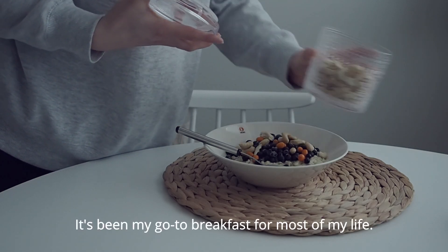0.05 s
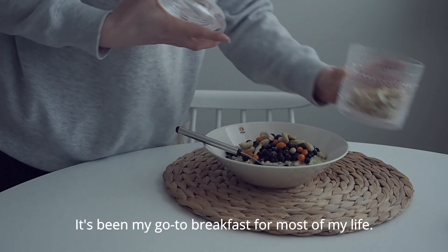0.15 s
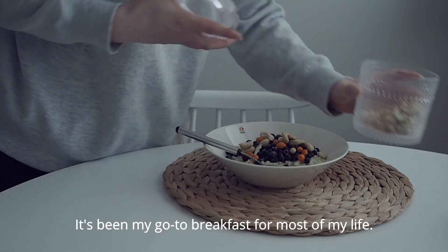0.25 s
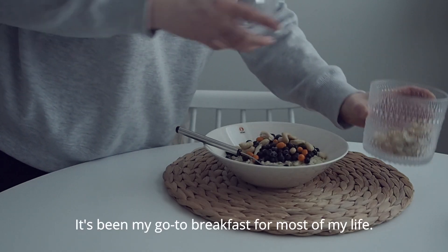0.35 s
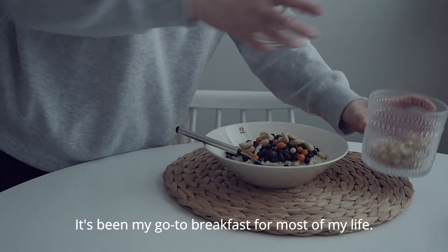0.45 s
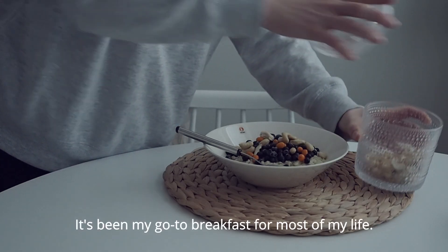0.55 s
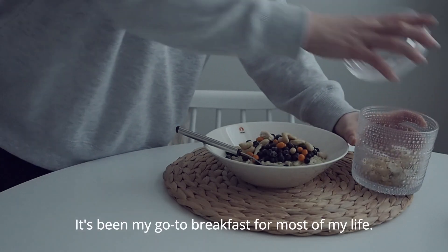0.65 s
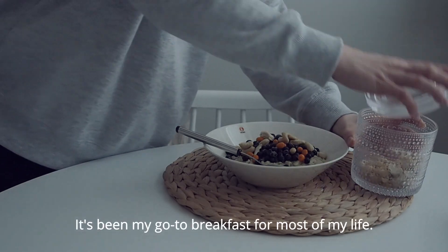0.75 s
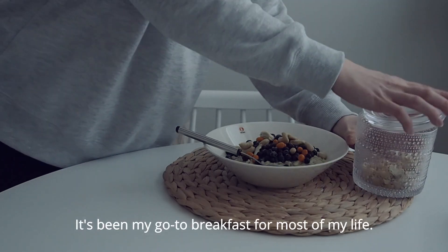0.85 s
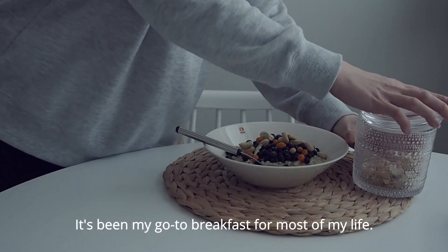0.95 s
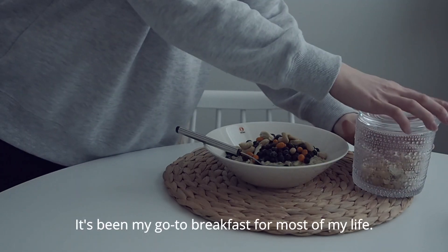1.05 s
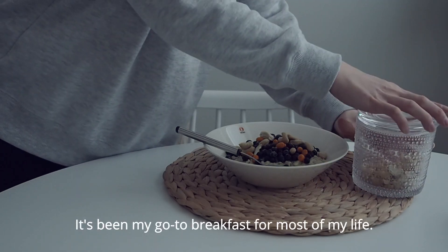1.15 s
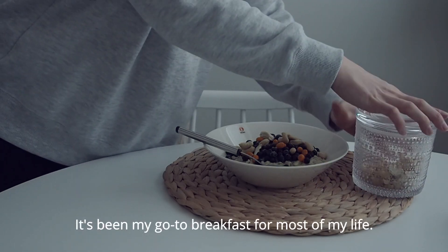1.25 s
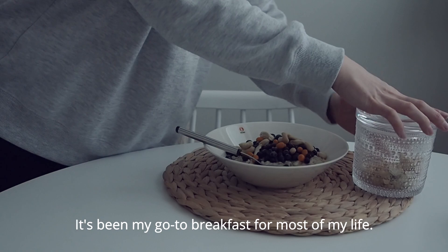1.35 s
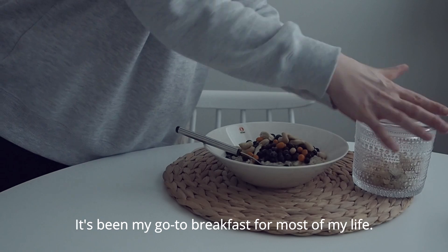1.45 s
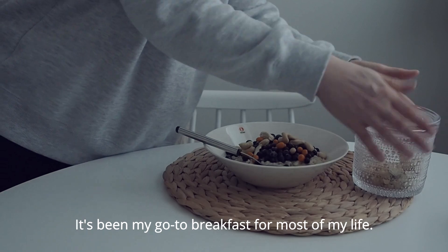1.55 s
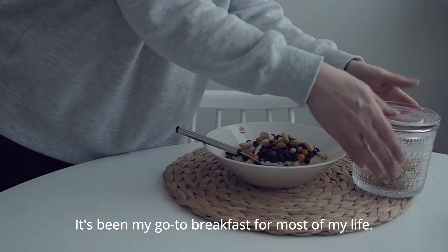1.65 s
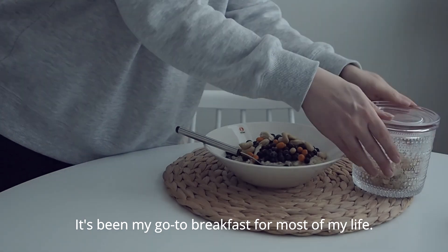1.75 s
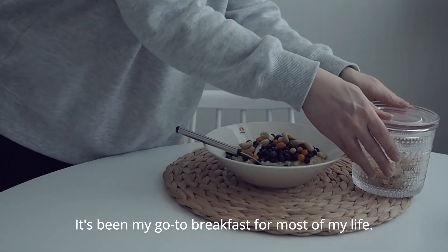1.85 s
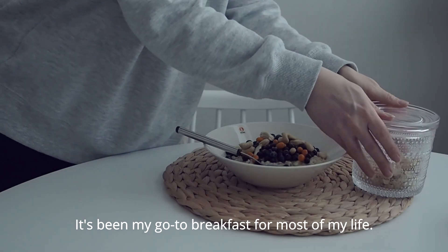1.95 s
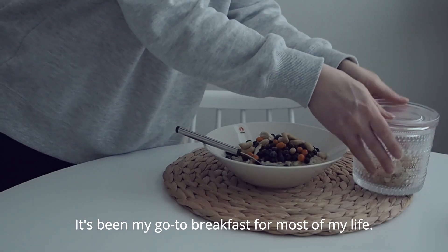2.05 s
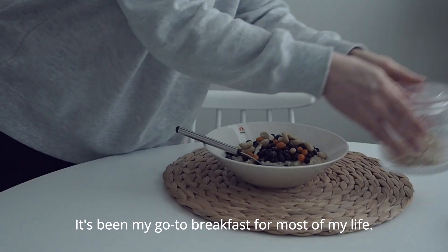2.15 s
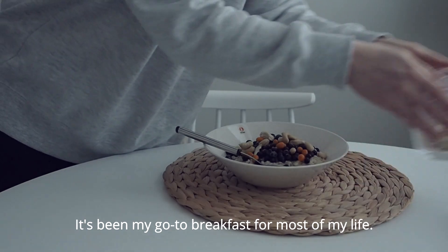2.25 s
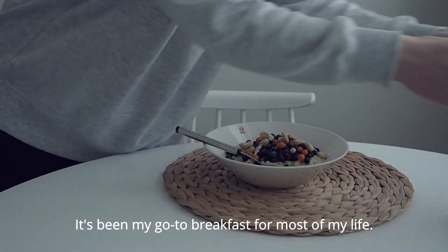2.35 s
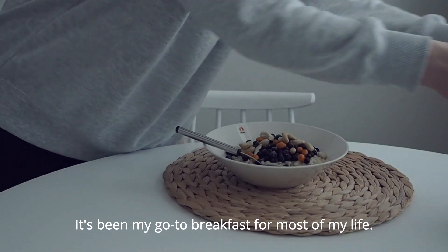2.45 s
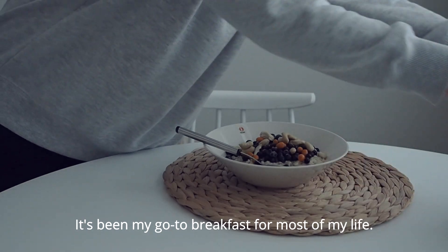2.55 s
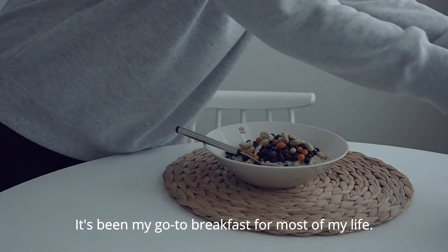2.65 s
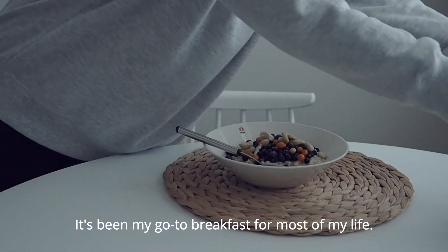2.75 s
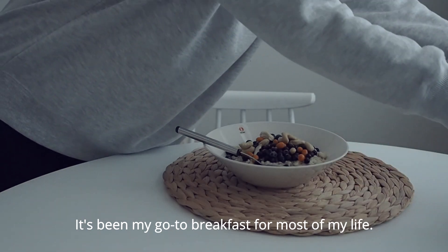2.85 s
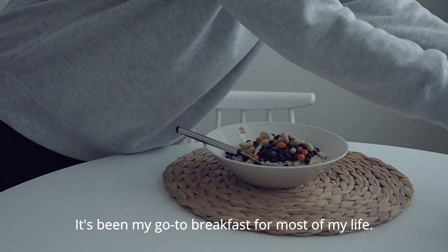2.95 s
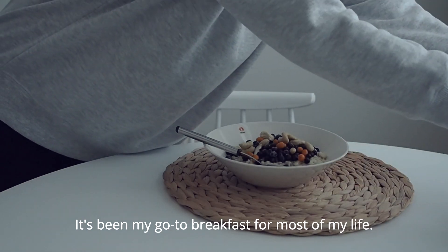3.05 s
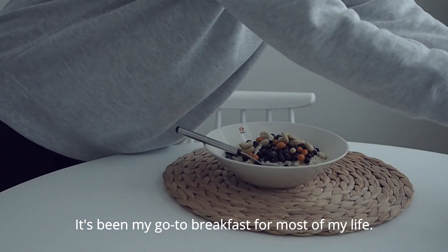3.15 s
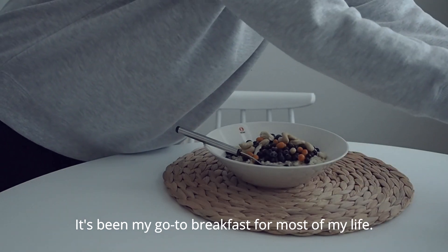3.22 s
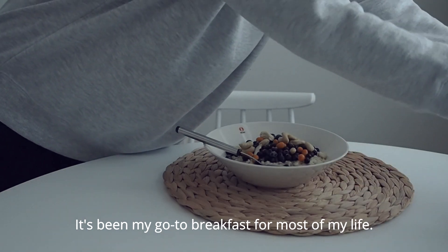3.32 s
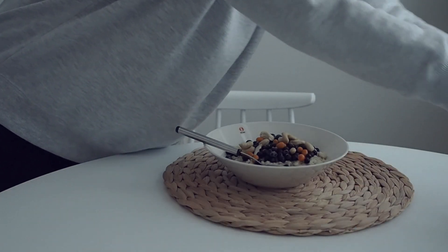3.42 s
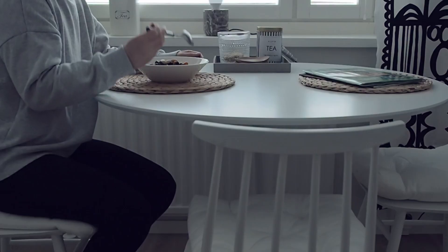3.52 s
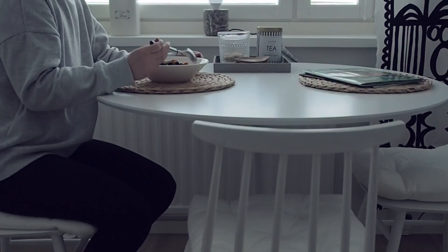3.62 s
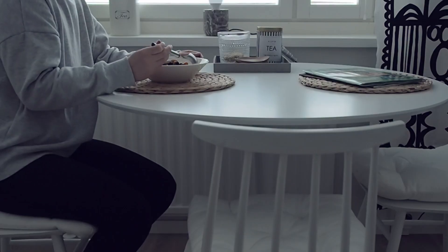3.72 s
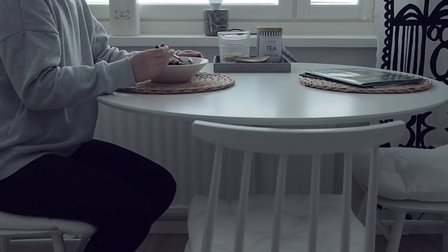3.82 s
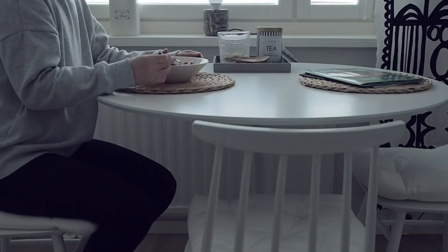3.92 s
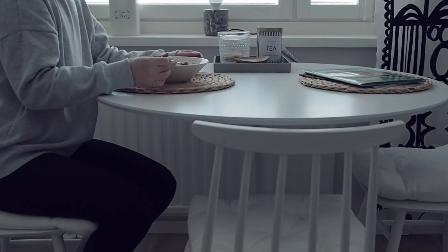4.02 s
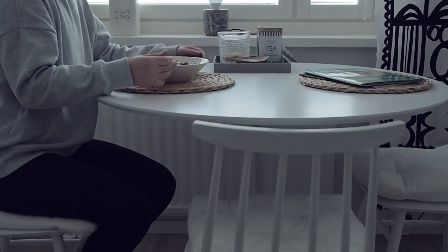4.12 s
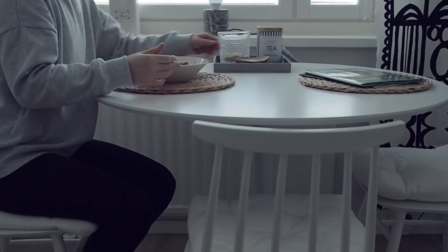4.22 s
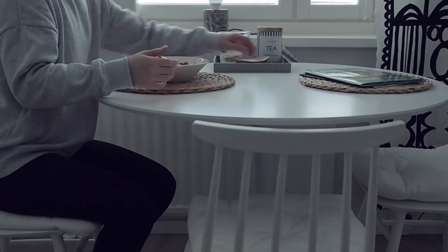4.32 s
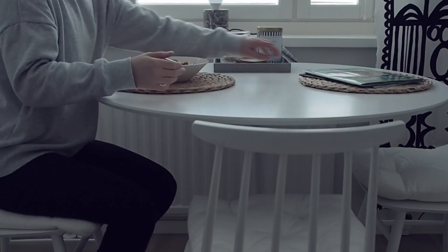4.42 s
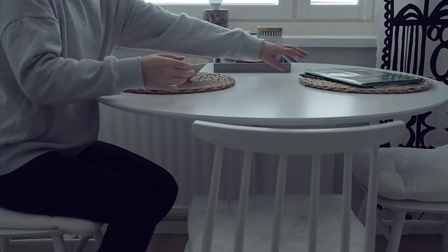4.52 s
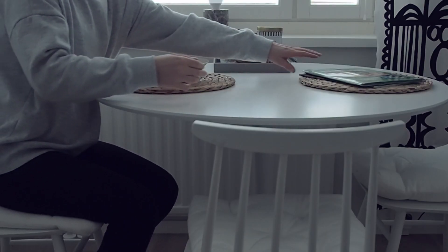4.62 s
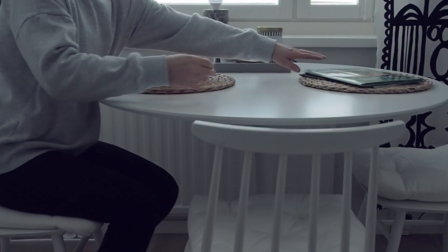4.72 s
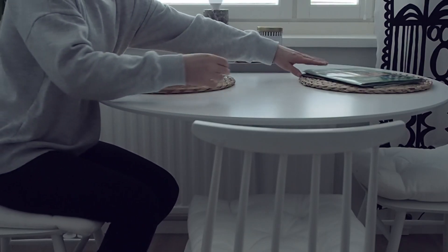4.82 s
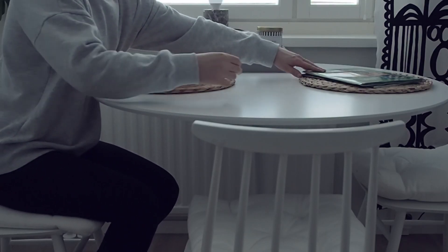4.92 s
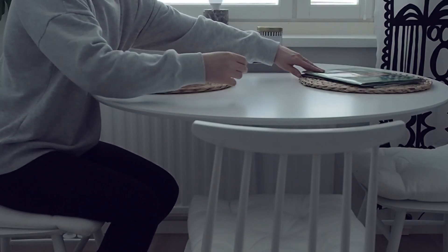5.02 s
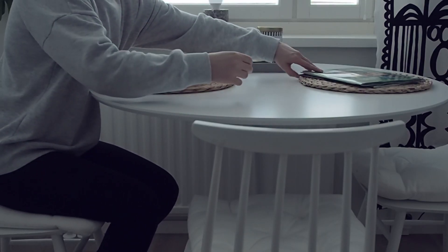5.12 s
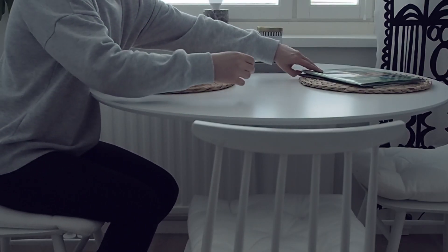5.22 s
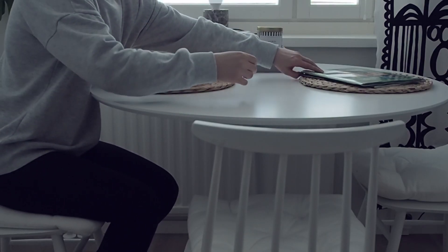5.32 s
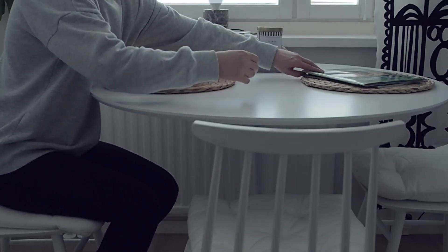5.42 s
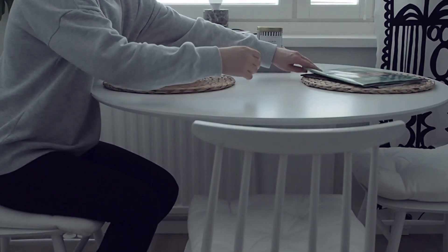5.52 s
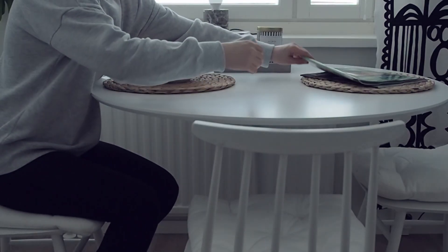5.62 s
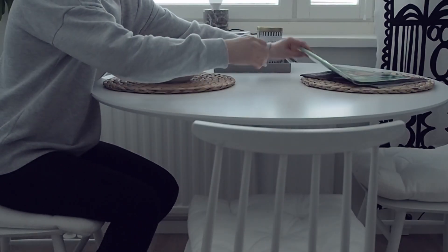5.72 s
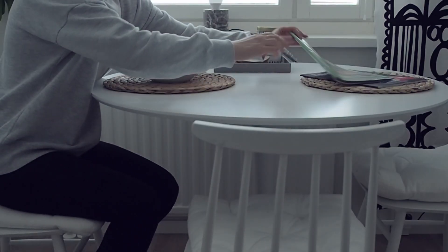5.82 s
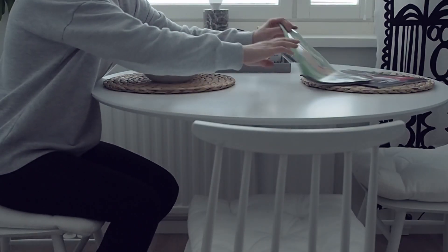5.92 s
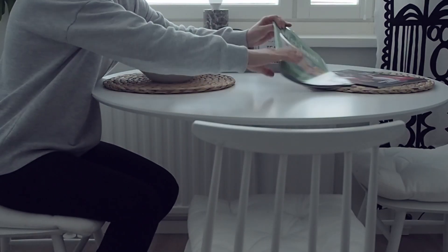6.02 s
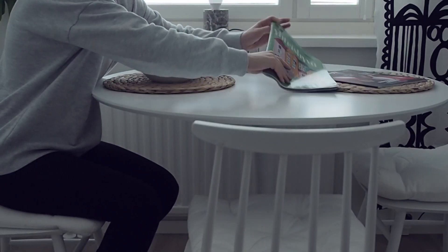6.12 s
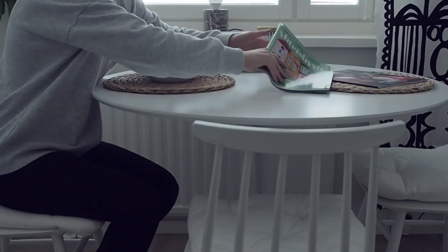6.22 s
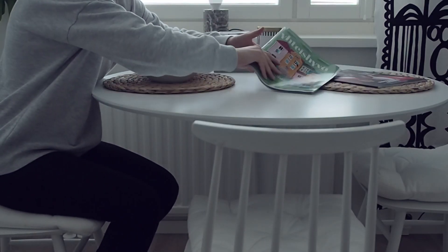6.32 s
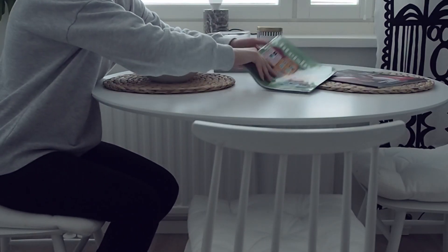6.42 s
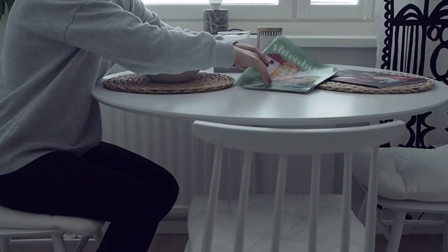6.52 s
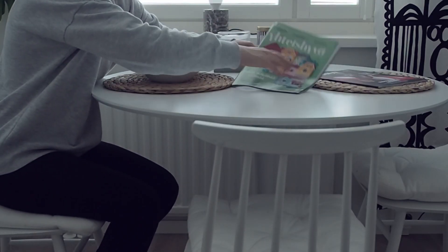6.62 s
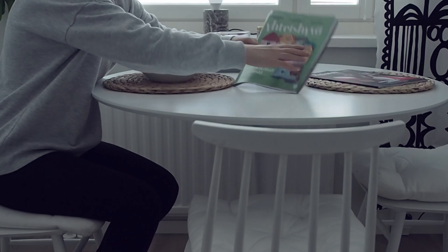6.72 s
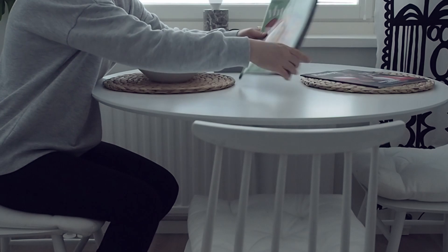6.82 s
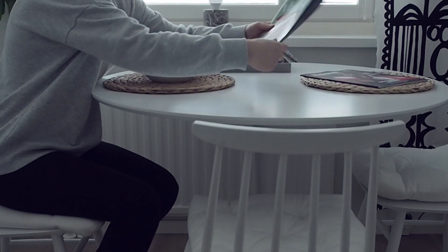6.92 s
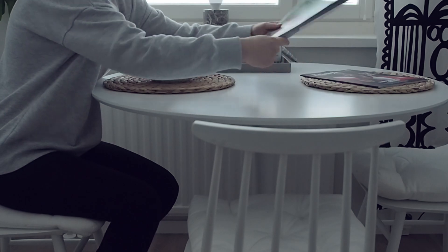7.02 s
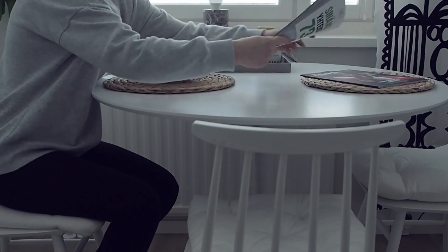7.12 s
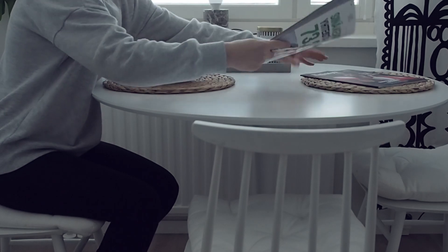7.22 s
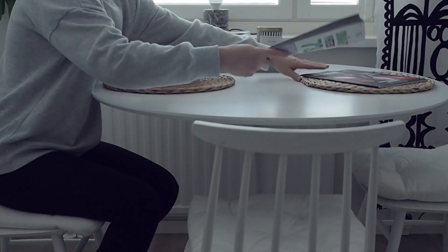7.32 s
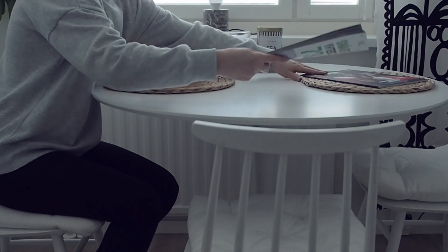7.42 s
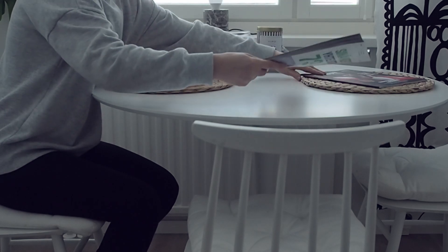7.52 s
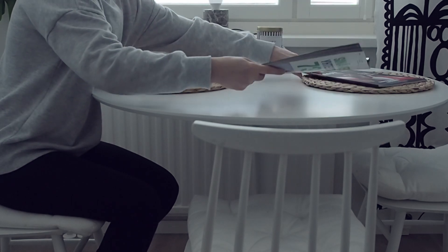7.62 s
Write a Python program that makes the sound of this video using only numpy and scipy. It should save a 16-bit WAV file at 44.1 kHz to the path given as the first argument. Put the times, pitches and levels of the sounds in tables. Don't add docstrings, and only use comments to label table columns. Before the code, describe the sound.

Heard from a distance through short, bright kitchen echoes: light finger taps on a glass lid with fabric rustle, then the lid chattering and seating on a glass jar with clear ringing. A small later clink follows, then a woody double knock as the jar is set down. A spoon clatters quickly on a ceramic bowl and strikes once more. Soft sleeve brushes lead into crisp paper sliding and flapping, over faint hum and hiss.

```python
import sys
import numpy as np
from scipy import signal
from scipy.fft import rfft, irfft, next_fast_len
from scipy.io import wavfile
from scipy.ndimage import uniform_filter1d, minimum_filter1d

SR = 44100
rng = np.random.default_rng(int(sys.argv[2]) if len(sys.argv) > 2 else 0)


def magnitude_from_level(level_db):
    exponent = np.asarray(level_db, float) / 20
    return 10 ** exponent


def bounce(signal):
    frames = np.transpose(np.atleast_2d(signal))
    limited = np.clip(frames, -1, 1)
    pcm = np.round(limited * 32767).astype(np.int16)
    wavfile.write(sys.argv[1], SR, pcm)


N = 337806

# (frequency [Hz], level [dB], left over right [dB])
MIC = [(60, -34, 0.5), (127, -11, 1.9), (620, 1.9, 2.5), (1300, 3.5, 0.9), (2500, -1, 1.5), (3500, 4, 1.5),
       (5000, 2, 2), (6100, -2.5, 0.5), (8450, -0.6, 3.5), (10200, -2.5, 2.5), (15100, 2.5, 8.5)]


def evened(x):
    return x / np.sqrt(np.mean(x ** 2) + 1e-20)


def read(points, hz, axis=1):
    points = np.array(points)
    return np.interp(np.log(hz + 1), np.log(points[:, 0] + 1), points[:, axis])


def add(mix, s, sound):
    part = mix[round(s * SR):][:len(sound)]
    part += sound[:len(part)]


def coloured(x, points):
    size = next_fast_len(x.shape[-1])
    response = magnitude_from_level(read(points, np.fft.rfftfreq(size, 1 / SR)))
    return irfft(rfft(x, size) * response, size)[..., :x.shape[-1]]


def drift(rate_hz):
    return evened(signal.lfilter(*signal.butter(2, rate_hz, fs=SR), rng.standard_normal((2, N))))


def ringing(pitches, modes, blows, lift_db, damping, sharp=(1, 1)):
    out, t = np.zeros(N), np.arange(SR // 4) / SR
    hz = np.c_[pitches]
    t60, *kinds_db = np.transpose(modes)[:, :, None]
    phases = rng.random((len(blows), len(modes), 1))
    for (s, blow_db, kind), phase in zip(blows, phases):
        kind = round(kind)
        level = magnitude_from_level(kinds_db[kind] + blow_db + lift_db - 60 * t / t60 / damping[kind])
        waves = level * np.sin(2 * np.pi * (hz * sharp[kind] * t + phase))
        add(out, s, waves.sum(0) * np.minimum(t * 600, 1))
    return out


def lasting(modes, blows, build_ms, lag_turns):
    grip_s = 0.045
    out, t = np.zeros((2, N)), np.arange(SR // 2) / SR
    hz, t60, *kinds_db = np.transpose(modes)[:, :, None]
    phases = rng.random((len(blows), len(modes), 1))
    lag = lag_turns * rng.choice([-1, 1], (len(modes), 1))
    shape = (1 - np.exp(-t / (build_ms / 1000))) * np.minimum(10 - 20 * t, 1)
    free_s = np.diff([row[0] for row in blows], append=np.inf)
    for (s, blow_db, kind), phase, free in zip(blows, phases, free_s):
        caught_db = 60 * np.maximum(t - free, 0) / grip_s
        level = magnitude_from_level(kinds_db[round(kind)] + blow_db - 60 * t / t60 - caught_db)
        for mix, late in zip(out, (0, lag)):
            waves = level * np.sin(2 * np.pi * (hz * t + phase + late))
            add(mix, s, waves.sum(0) * shape)
    return out


def knocks(rows, lift_db):
    out, t, hz = np.zeros(N), np.arange(4096) / SR, np.fft.rfftfreq(8192, 1 / SR)
    for s, blow_db, centre_hz, octaves, ms in rows:
        away = np.log2((hz + 1) / centre_hz) / octaves
        skewed = away * np.where(away > 0, 1.4, 1)
        gain = np.maximum(-skewed ** 2 / 2, -9)
        noise = rng.standard_normal(4096)
        chatter = rfft(noise * np.minimum(t * 500, 1) * np.exp(-t / (ms / 1000)), 8192)
        gain = gain - np.log(uniform_filter1d(abs(chatter), size=15))
        mirrored = np.r_[gain, gain[-2:0:-1]]
        causal = np.exp(np.conj(signal.hilbert(mirrored))[:len(hz)])
        burst = irfft(chatter * causal)
        add(out, s, magnitude_from_level(blow_db + lift_db) * burst / np.linalg.norm(burst))
    return out


def room(x, direct_db, build_ms):
    # (frequency [Hz], t60 [s])
    kitchen = [(120, 0.8), (400, 0.27), (1000, 0.52), (2800, 0.5), (7000, 0.41), (15000, 0.24)]
    echo_size = 28000
    taps = np.zeros((2, echo_size))
    at = np.arange(40, echo_size - 16, 16)
    at = at + rng.integers(0, 16, (2, len(at)))
    np.put_along_axis(taps, at, rng.choice([-1., 1.], at.shape), 1)
    hz, t, z = signal.stft(taps, SR, nperseg=256)
    tail = signal.istft(z * magnitude_from_level(-60 * t / read(kitchen, hz)[:, None]), SR, nperseg=256)[1]
    t = np.arange(tail.shape[1]) / SR
    tail *= 1 - np.exp(-t / (build_ms / 1000))
    tail *= 1 + 0.66 * np.exp(-t / 0.011)
    tail /= np.sqrt((tail ** 2).sum() / 2)
    tail[[0, 1], [0, 32]] = magnitude_from_level(direct_db)
    return signal.fftconvolve(x[None], tail, axes=1)[:, :N]


def air():
    # (frequency [Hz], density [dB per Hz])
    hum_colour = [(35, -47), (60, -6.5), (76, -11.5), (201, -2), (352, -6), (1210, 1.5), (1430, -4),
                  (1720, 0.5), (2550, -13.5), (3070, -4.5), (4790, -11), (5630, -21), (8180, -14.5),
                  (15700, -23)]
    hum_db, rumble_db = -56.5, -69
    hum, wind = rng.standard_normal((2, 2, N))
    rumble = signal.sosfilt(signal.butter(4, [8, 28], "band", fs=SR, output="sos"), wind)
    hum_level = magnitude_from_level(hum_db + 0.46 * drift(0.85))
    return hum_level * evened(coloured(hum, hum_colour)) + magnitude_from_level(rumble_db) * evened(rumble)


def lid_in_hand():
    lid_hz = [1330, 2987, 5100, 6932, 9205, 10650, 13352, 14262]
    # (t60 [s], tapped on the face [dB], tapped on the edge [dB])
    lid_modes = [(0.14, -14.5, -35), (.046, -14, -26), (0.14, -19, -24), (0.11, -17, 2), (.08, -16, -30),
                 (0.064, -27, 0), (0.056, -30, -9), (.06, -28, -14)]
    # (time [s], blow [dB], column of levels)
    taps = [
        (.002, -44, 0),
        (0.02, -47, 0),
        (0.066, -45, 0),
        (0.12, -48, 1),
        (0.159, -48, 1),
        (0.202, -55, 0),
        (.232, -43, 1),
        (0.25, -64, 1),
    ]
    return ringing(lid_hz, lid_modes, taps, 3.9, [.8, 1.1])


def jar_wall():
    wall_hz = [522, 752, 1328, 1348, 2089, 2985, 2998, 5102, 1695, 890, 1535, 572, 3009, 1381]
    # (t60 [s], struck [dB], grazed [dB], lid alone [dB], rocking [dB], pressed tight [dB])
    wall_modes = [(0.39, -20, -23, -44, -15.5, -10.5), (0.15, -11, -29, -28, -26, -19),
                  (0.42, 2, -15, -13.5, -1, -9), (0.46, -14, -16, -26, -11, -7.5),
                  (.4, -28, -28, -28, -23, -13), (0.43, -20, -12, 2.5, -3, -24),
                  (.37, -19, -1, -18, -22, -9), (.24, -14.5, -28, -12, -17, -7),
                  (.26, -31, -15, -30, -30, -34), (.2, -17, -15, -11, -26, -23),
                  (.5, -14, -22, -32, -17, -20), (0.17, -27, -5, -42, -28, -24),
                  (0.54, -32, -22, -30, -28, -6.5), (0.39, -35, -30, -40, -30, -3)]
    # (time [s], blow [dB], column of levels, rounded)
    nudges = [(.003, -46.5, 2.5), (.062, -43, 2), (.118, -61, 1.5), (.203, -40.5, 2), (0.821, -25, 0),
              (.846, -26, 0), (.866, -27, 3), (.895, -37, 0.5), (0.951, -35.5, 0), (1.018, -24, 0),
              (1.04, -25, 1), (1.075, -26, 4), (1.258, -39, 1)]
    return lasting(np.c_[wall_hz, wall_modes], nudges, 2.5, 0.25)


def rubbing(grain_db, rate_hz):
    # (frequency [Hz], density [dB per Hz])
    hiss_colour = [(1470, -50), (2500, -48), (2900, -7), (4210, 1.5), (5970, -6), (8330, -3.5),
                   (14700, -11), (16000, -21)]
    # (frequency [Hz], density [dB per Hz])
    body_colour = [(150, -20), (300, -5.5), (500, -16), (900, 4.5), (1300, -3.5), (2400, -2.5), (3500, 0.5),
                   (5000, -3.5), (7000, -22)]
    # (fastest moment [s], hiss [dB], body above the hiss [dB], time to die away [s])
    sweeps = [(.01, -57.5, 7.5, 0.31), (.15, -55.5, 9, 0.24), (.24, -55, -5, 0.13), (.582, -64.5, 9, 0.12),
              (0.803, -63, 12, 0.057), (1.6, -87, 11, .5), (1.844, -68, -3, .05), (2.024, -62, -2, 0.11),
              (2.2, -78, 16, 0.36), (2.5, -65, -10, 0.22), (2.69, -65, 5.5, .15), (4.25, -63, 8, 0.076),
              (4.41, -60, 4.5, 0.21), (4.83, -58.5, -4, 0.2), (5.11, -61.5, 1.5, 0.34),
              (5.388, -50, -3, 0.2), (5.6, -67.5, 15, 0.11), (5.77, -57, 8.5, 0.45),
              (5.95, -52, -3.5, 0.79), (6.13, -52.5, 12, 0.13), (6.3, -56, -7, 0.13), (6.43, -53, -2, 0.05),
              (6.5, -54.5, 8, 0.21), (6.678, -54, 2.5, 0.17), (6.78, -81, 19, 0.27),
              (6.872, -47.5, 0, 0.19), (7.03, -71, 12.5, 0.32), (7.36, -82, 1, .3), (7.475, -57, 3.5, 0.23),
              (7.66, -48.5, -2, 0.14)]
    fall_db, rise_share, body_linger = 21.5, 0.6, 1.23
    t = np.arange(0, N + 64, 64) / SR
    s, hiss_db, body_db, length = np.transpose(sweeps)[:, :, None]
    away_db = fall_db * np.where(t < s, (s - t) / rise_share, t - s) / length
    hiss_swell = np.linalg.norm(magnitude_from_level(hiss_db - away_db), axis=0)
    body_swell = np.linalg.norm(magnitude_from_level(hiss_db + body_db - away_db / body_linger), axis=0)
    hiss = np.interp(np.arange(N) / SR, t, hiss_swell)
    body = np.interp(np.arange(N) / SR, t, body_swell)
    strength = magnitude_from_level(grain_db * np.minimum(rng.exponential(1, N), 4))
    catch = strength * (rng.random(N) < rate_hz / SR)
    grains = np.sqrt(signal.lfilter([1], [1, -np.exp(-1 / (0.004 * SR))], catch ** 2) + 0.99)
    a, b = rng.standard_normal((2, 2, N)) * grains
    return hiss * evened(coloured(a, hiss_colour)) + body * evened(coloured(b, body_colour))


def jar_knocks():
    # (time [s], blow [dB], centre [Hz], spread [octaves], contact [ms])
    jar_contacts = [(.204, -47.5, 3200, 0.9, 2), (.848, -44, 700, .2, 4), (.222, -51, 8000, 1.2, 2.9),
                    (1.27, -48.5, 3920, .06, 6), (.235, -54.5, 4430, 1.1, 14), (.57, -60, 2500, 2.1, 22),
                    (.816, -39.5, 790, 0.47, 4.7), (.818, -46.5, 1910, 0.35, 2.5),
                    (.82, -49.5, 5000, 0.97, 4.9), (1.015, -40, 2340, 1.4, 6), (1.074, -41, 2220, 0.8, 6),
                    (1.256, -38, 2760, 1.03, 11), (1.26, -50.5, 856, 0.22, 3.9),
                    (1.262, -46.5, 1716, 0.076, 2.6), (1.1, -43.5, 425, 0.45, 12.5),
                    (1.275, -50.5, 253, 0.25, 2.7), (1.262, -45, 6350, 0.061, 1.7),
                    (1.742, -60.5, 1300, 1.2, 1.6), (2.27, -50, 1300, 1.93, 1.5),
                    (2.273, -55.5, 4030, 0.077, 3.2), (2.29, -58.5, 341, 0.19, 8.6),
                    (2.303, -48.5, 8800, 0.28, 1.5), (2.685, -60, 1690, 0.75, 7.1),
                    (1.255, -46.5, 428, 0.2, 3.5), (1.365, -51, 416, 0.73, 12),
                    (1.008, -52, 1500, 0.96, 4.7), (1.034, -44.5, 3880, 0.8, 2.2),
                    (1.258, -54, 9000, 1.1, 3), (2.305, -54, 3050, .12, 4)]
    return knocks(jar_contacts, 34.5)


def lid_on_jar():
    glass_hz = [520, 625, 955, 1328, 1346, 2998, 2982, 3290, 3800, 5100, 5160, 6960, 7710]
    # (t60 [s], first contact [dB], seating [dB], pressed tight [dB])
    glass_modes = [(0.048, -34, -2, -35), (0.026, -.5, -1, -27), (0.038, -34, -4.5, -6),
                   (0.082, 2.5, -13, -28), (.12, -10, -6.5, -33.5), (0.053, -18, -0.5, -24),
                   (.077, -11, -14, -9), (0.048, -26, -10, -16), (.04, -35, -12, -23),
                   (.095, -11, -15, -12), (0.041, -35, -27, -8), (.12, -48, -45, -27),
                   (0.088, -29, -22, -17)]
    rim_hz = [8152, 8295, 9372, 9182, 10605, 10797, 12247, 13365, 14236, 14381, 14720, 15278, 15400]
    # (t60 [s], first contact [dB], seating [dB], pressed tight [dB])
    rim_modes = [(0.083, -13, -12.5, 3.5), (0.081, -26, -32, -10), (0.081, -20, -21, 0.5),
                 (0.11, -24, -19, 2), (.065, -42, -38, -15), (0.18, -26.5, -22, -22.5),
                 (0.08, -30, -25, -7), (.096, -42, -37, -8), (.07, -29, -34, -18), (.07, -26, -30, -18),
                 (0.046, -39, -32, -12), (.07, -48, -31, -16), (.06, -40, -36, -13)]
    # (time [s], blow [dB], column of levels)
    clinks = [
        (.818, -26.5, 0),
        (.848, -36, 0),
        (.868, -41, 1),
        (0.961, -56, 0),
        (1.014, -24.5, 1),
        (1.074, -38, 0),
        (1.077, -43, 2),
        (2.305, -31.5, 2),
        (2.33, -63, 2),
    ]
    pressed = 1.004
    return ringing(glass_hz + rim_hz, glass_modes + rim_modes, clinks, 4.2, [1.1, .9, .45],
                   (1, 1, pressed))


def jar_lip():
    lip_hz = [7705, 7790, 8155, 8180, 9180, 9230, 9360, 9408, 10800, 12250, 14380, 15278]
    # (t60 [s], struck [dB], seated [dB], pressed tight [dB])
    lip_modes = [(.25, -14, -7, -30), (.25, -30, -30, -5), (.25, -3, -.5, -30), (.3, -30, -30, -.5),
                 (.3, -9, -4, -30), (.3, -30, -30, -3), (.3, -10, -7, -30), (.25, -30, -30, -7),
                 (.3, -8, -5, -16), (.3, -17, -8, -12), (.25, -17, -15, -20), (.25, -30, -13, -20)]
    # (time [s], blow [dB], column of levels)
    tings = [
        (.821, -47, 0),
        (1.018, -45, 1),
        (1.046, -46, 1),
        (1.078, -47, 2),
        (2.306, -45, 2),
    ]
    return lasting(np.c_[lip_hz, lip_modes], tings, 2.5, 0.22)


def shelf_knocks():
    # (time [s], blow [dB], centre [Hz], spread [octaves], contact [ms])
    shelf_contacts = [(2.998, -42, 810, 0.62, 2.9), (3.006, -23.5, 810, 0.79, 2),
                      (3.01, -22, 2020, 0.72, 4), (2.99, -44, 790, 0.3, 7), (3.01, -37.5, 3500, 1.28, 1.8),
                      (3.012, -30.5, 353, 0.37, 9.4), (3.04, -26.5, 975, 0.66, 13),
                      (3.175, -49, 6700, 1.1, 10), (3.212, -44.5, 4700, 0.7, 3.7),
                      (3.195, -32, 1860, 0.65, 29), (3.209, -23.5, 880, 1.47, 13),
                      (3.245, -24.5, 330, 0.75, 10.3), (3.01, -40, 125, 0.28, 7.4),
                      (3.245, -31, 138, 0.93, 10), (3.01, -52, 11000, .8, 3)]
    return knocks(shelf_contacts, 27.0)


def shelf_boards():
    # (frequency [Hz], t60 [s], first landing [dB], second [dB], settling [dB])
    shelf_modes = [(122.4, 0.58, 0, -6, 3), (215.5, 0.71, -22, -6, -1.5), (251, 0.26, -8.5, 5, -15),
                   (356, 0.37, -3, -0.5, -11), (418, 0.55, -9, -19, -14), (522, 0.48, -9, 0.5, -8),
                   (585, 0.4, -9, -16, -11.5),
                   (725, 0.18, 2, -9, -20), (854, 0.28, 0, -12, 5), (956, 0.22, 6, -24, -19),
              (1096, 0.29, 1.5, -6, -6), (1155, .3, -14, -9, -10), (1267, 0.21, -0.5, -11, -8),
              (1360, 0.26, -7, -17, -10), (1385, 0.27, -11, -14, -14), (1500, 0.4, -11, -22, -4),
              (1740, 0.42, -6, -11, -7), (1900, 0.46, -2.5, -11, -5), (2328, 0.35, -1, -22, -18),
              (2420, 0.24, -20, -5, -10), (804, .3, 0, -12, -12)]
    # (time [s], blow [dB], column of levels)
    landings = [
        (3.008, -30.5, 0),
        (3.04, -32, 0),
        (3.085, -36, 0),
        (3.211, -29, 1),
        (3.246, -33.5, 2),
    ]
    return lasting(shelf_modes, landings, 5.3, 0.28)


def table_knocks():
    # (time [s], blow [dB], centre [Hz], spread [octaves], contact [ms])
    table_contacts = [(3.711, -35.5, 3500, 1.46, 7.6), (3.983, -31, 2400, 0.95, 4),
                      (3.988, -51.5, 578, 0.17, 4.2), (3.986, -38, 5800, 0.84, 6.1),
                      (4.6, -60, 297.5, 0.11, 150), (4.595, -61, 520, 0.34, 2.5),
                      (5.56, -50, 2800, 1.02, 1.9), (5.682, -40.5, 1790, 1.54, 5.7),
                      (6.015, -42.5, 2360, 1.57, 37), (6.08, -52, 226, 0.3, 4.9),
                      (6.128, -40, 2090, 1, 3.3), (6.416, -49.5, 2000, 1.04, 6.3), (6.5, -45.5, 1500, 1, 7),
                      (6.75, -52, 900, 1.8, 60), (5.72, -52, 1134, .2, 15), (6.136, -43.5, 2470, 1.04, 1.2),
                      (6.175, -58, 2160, .9, 1.6), (6.225, -57, 1300, 0.98, 2.7),
                      (6.52, -56.5, 1730, 0.43, 2.8), (6.79, -57.5, 1510, 0.37, 8),
                      (6.88, -60, 3500, 1.2, 2), (3.83, -50.5, 2500, 1.4, 4.4)]
    return knocks(table_contacts, 33.47)


def spoon_on_bowl():
    bowl_hz = [1185, 1508, 1832, 2735, 2709, 3440, 3775, 3900, 4895, 4975, 6150, 6228, 3620, 6290]
    # (t60 [s], first stroke [dB], second [dB])
    bowl_modes = [(.07, -16.5, -13), (.073, -16, -8), (.12, -11, -9), (0.092, -7, 1.5), (.067, -20, -3),
                  (.08, -15, -15), (0.09, -11, -20), (.067, -11, -12), (0.096, -4.5, -3), (0.049, -25, -4),
                  (0.079, -13, -8), (.053, -22, -5), (0.061, -21, -12), (0.055, -11, -25)]
    spoon_hz = [7306, 7518, 7620, 7729, 7975, 8014, 8101, 9187, 9338, 10847, 11128, 14053, 14240, 15068]
    # (t60 [s], first stroke [dB], second [dB])
    spoon_modes = [(0.043, -1, -12), (.06, -7, -20), (.06, -17, -7), (0.045, -3.5, -14), (0.049, -7.5, -20),
                   (.07, -13, -11), (.06, -8, -14), (0.067, -16, -25), (0.086, -17, -6.5),
                   (0.033, -7.5, -20), (.06, -18, -10), (.035, -11, -26), (0.046, -22, -16),
                   (.07, -22, -16)]
    # (time [s], blow [dB], column of levels)
    strokes = [
        (3.711, -28, 0),
        (3.724, -28.5, 0),
        (3.745, -29, 0),
        (3.821, -51, 0),
        (3.963, -46, 1),
        (3.984, -21, 1),
    ]
    return ringing(bowl_hz + spoon_hz, bowl_modes + spoon_modes, strokes, 3.7, [1.1, .9])


def bowl_belly():
    belly_hz = [1816, 2734, 3725, 4895, 6228, 11128, 12997, 4962, 5250, 5570]
    # (t60 [s], first stroke [dB], second [dB])
    belly_modes = [(.27, -14, -25), (.36, -15, 3.5), (0.38, -5, -14), (.34, .5, -8), (.31, -24, -17),
                   (.25, -22, -14), (.25, -28, -11), (.27, -22, -12), (0.33, -28, -22), (.25, -30, -24)]
    # (time [s], blow [dB], column of levels)
    rings = [
        (3.716, -27.5, 0),
        (3.745, -28, 0),
        (3.815, -36, 0),
        (3.986, -26.5, 1),
    ]
    return lasting(np.c_[belly_hz, belly_modes], rings, 4.6, 0.2)


def scene():
    jar = room(lid_in_hand() + jar_knocks() + lid_on_jar(), -12.5, 0.84)
    shelf = room(shelf_knocks(), -14.0, 2.1)
    table = room(spoon_on_bowl() + table_knocks(), -12.0, 1.8)
    rings = jar_wall() + jar_lip() + shelf_boards() + bowl_belly()
    quiet = magnitude_from_level(-0.5) * rubbing(2.5, 900) + air()
    return coloured(jar + shelf + table + rings, MIC) + quiet


def gated(x, near_db, loud_db, tilt_db):
    hz, _, z = signal.stft(x, SR, nperseg=1024)
    power = (abs(z) ** 2).mean(0)
    power = uniform_filter1d(uniform_filter1d(power, size=3, axis=0), size=3, axis=1)
    level_db = 10 * np.log10(power + 1e-20)
    beside_db = -minimum_filter1d(-level_db, size=41, axis=0) - near_db
    treble_db = 10 * np.log10(power[hz > 2500].sum(0) + 1e-20)
    under_db = treble_db - loud_db + tilt_db * np.log2(hz / 6000 + 1e-3)[:, None]
    hidden = (level_db < np.maximum(beside_db, under_db)) & (hz > 5400)[:, None]
    return signal.istft(z * np.where(hidden, .03, 1), SR, nperseg=1024)[1][:, :N]


def low_pass(x):
    return signal.sosfilt(signal.butter(12, 16530, fs=SR, output="sos"), x)


def record(dry):
    edge_hz = 15790
    size = next_fast_len(N)
    hz = np.fft.rfftfreq(size, 1 / SR)
    lean = magnitude_from_level(np.outer([.5, -.5], read(MIC, hz, axis=2))) * (hz < edge_hz)
    heard = irfft(rfft(dry, size) * lean, size)[:, :N]
    return low_pass(gated(heard, 24, 55.5, 2.5))


dry = scene()
out = record(dry)
bounce(out)
```